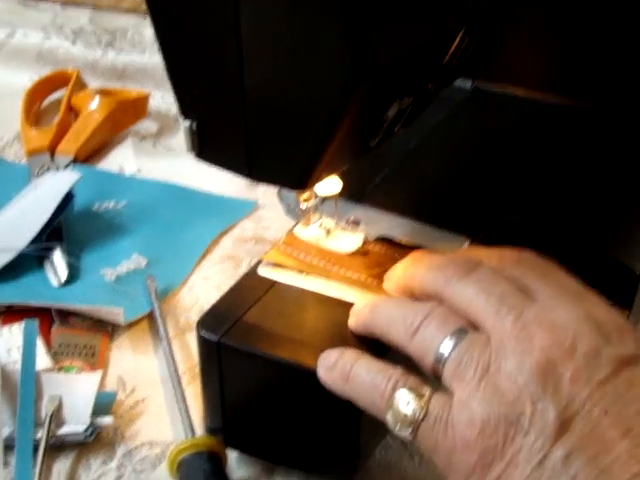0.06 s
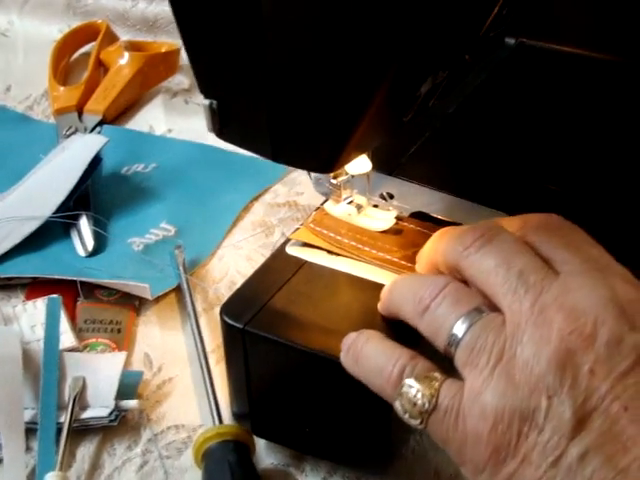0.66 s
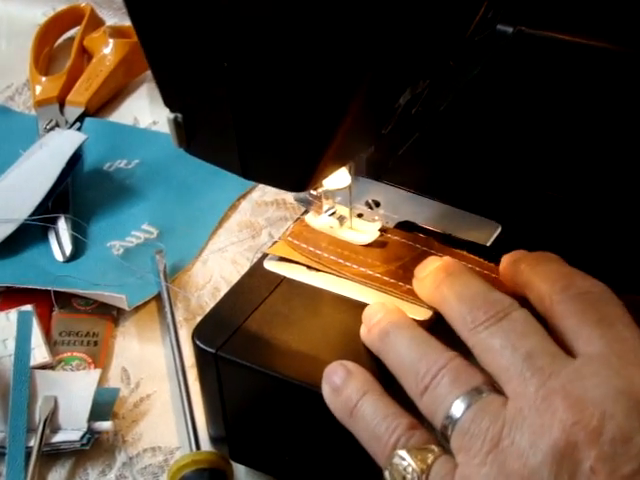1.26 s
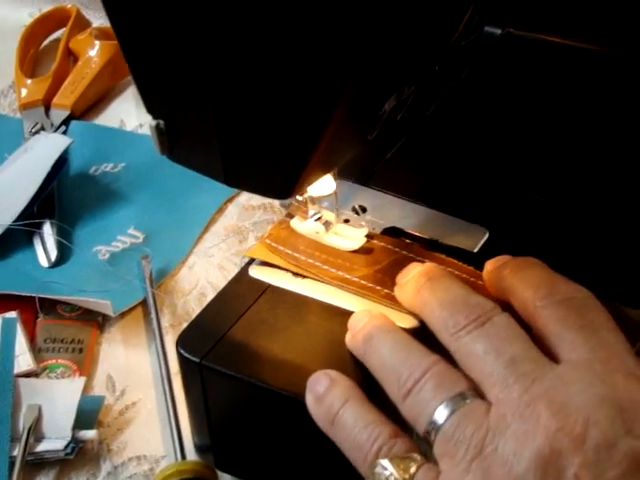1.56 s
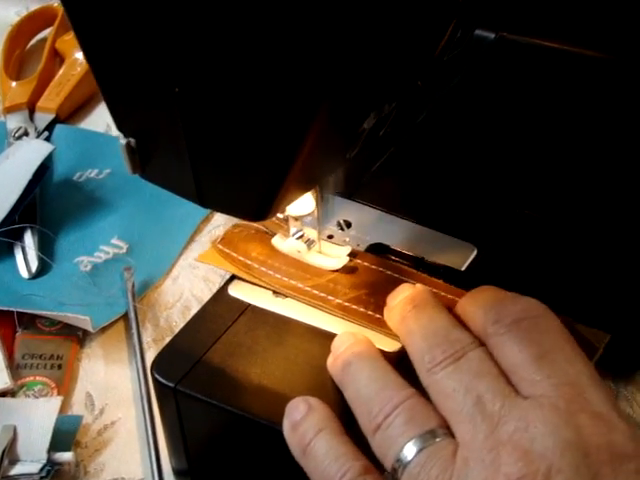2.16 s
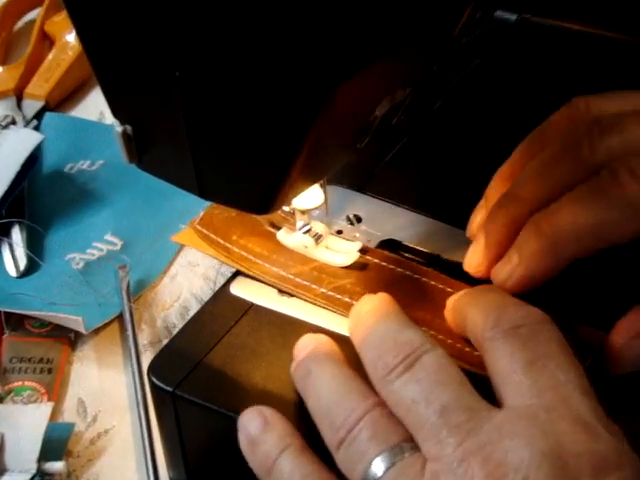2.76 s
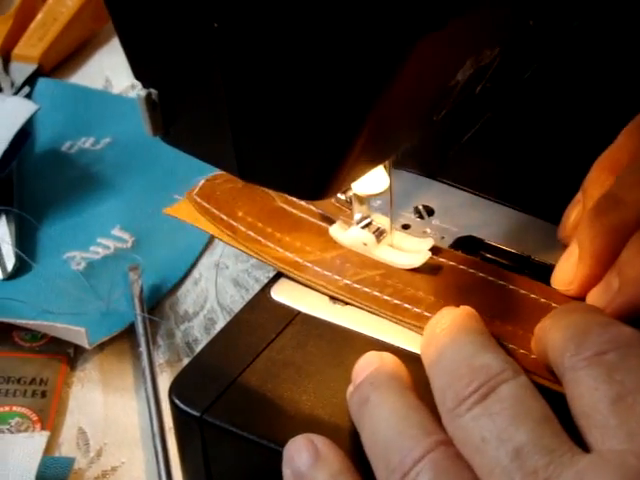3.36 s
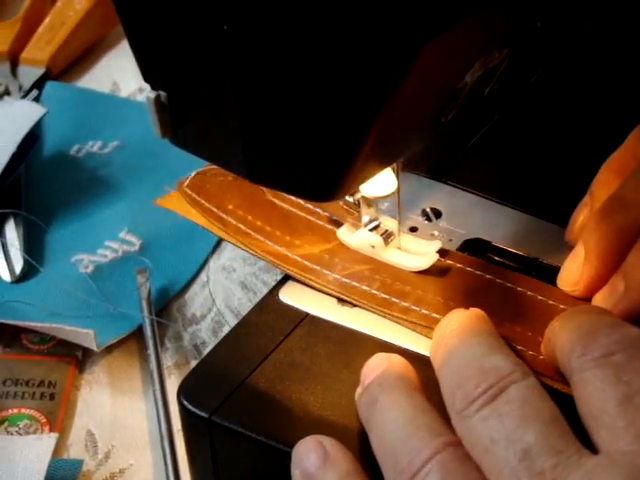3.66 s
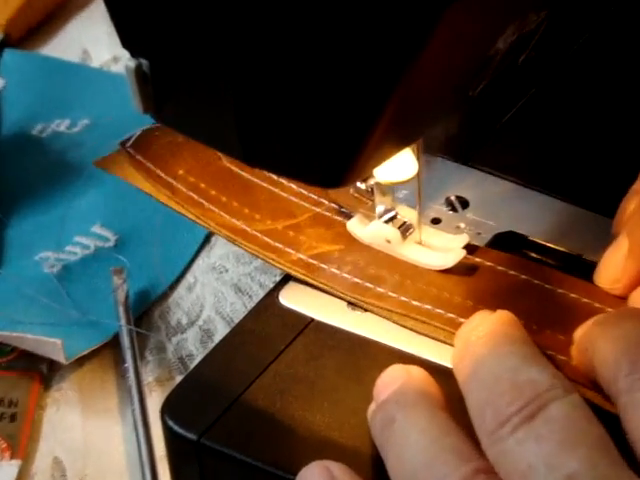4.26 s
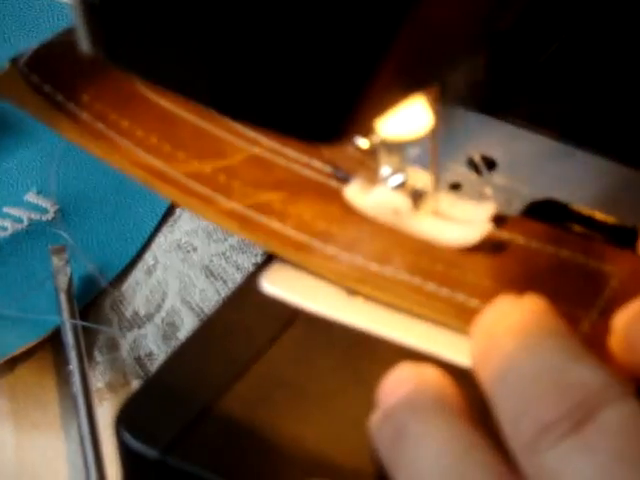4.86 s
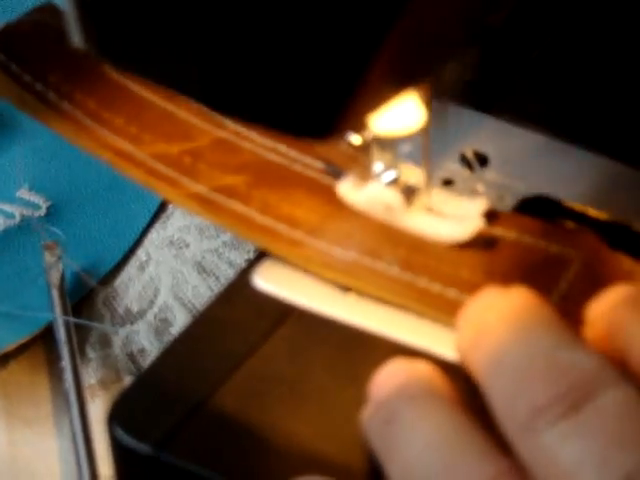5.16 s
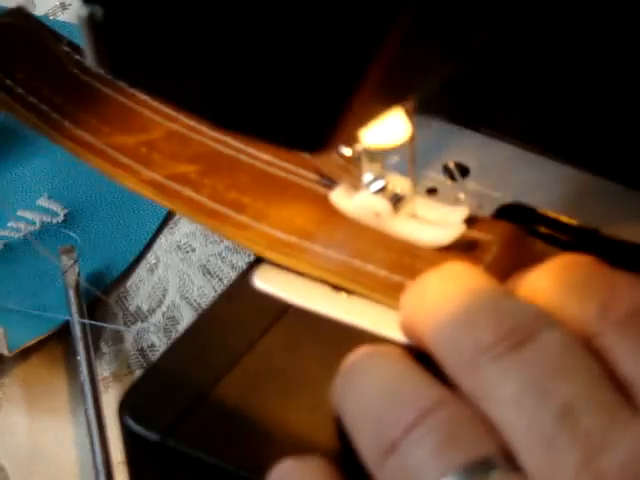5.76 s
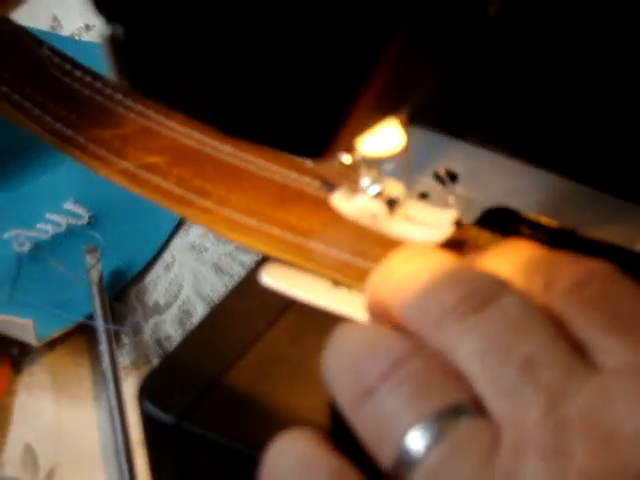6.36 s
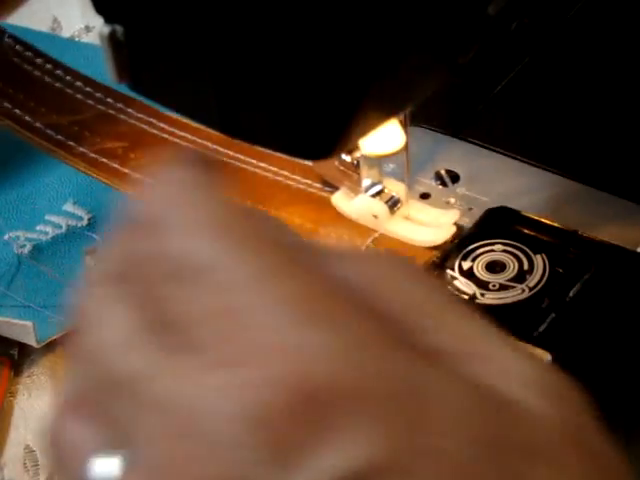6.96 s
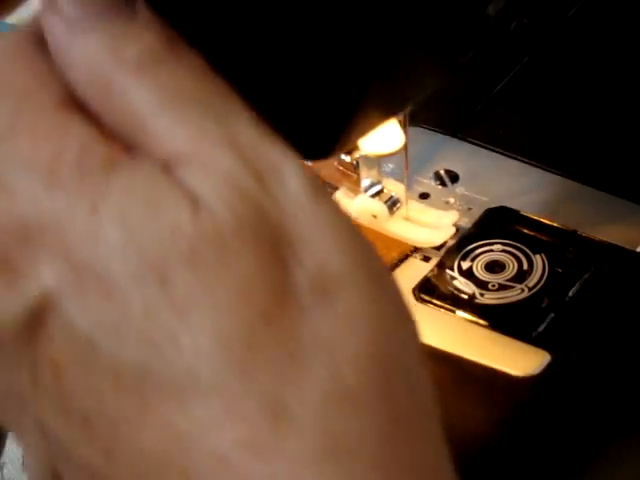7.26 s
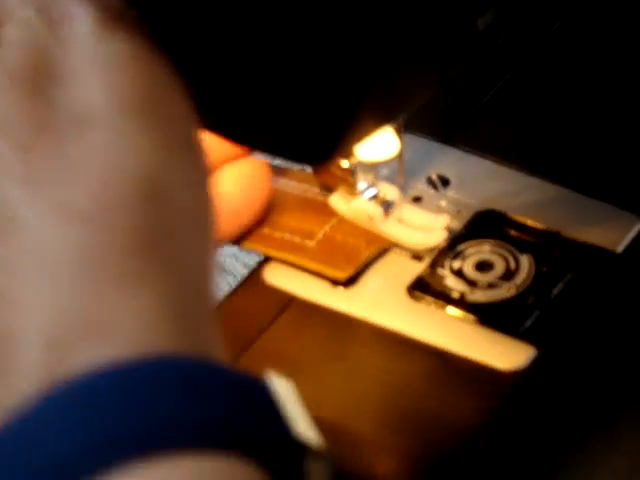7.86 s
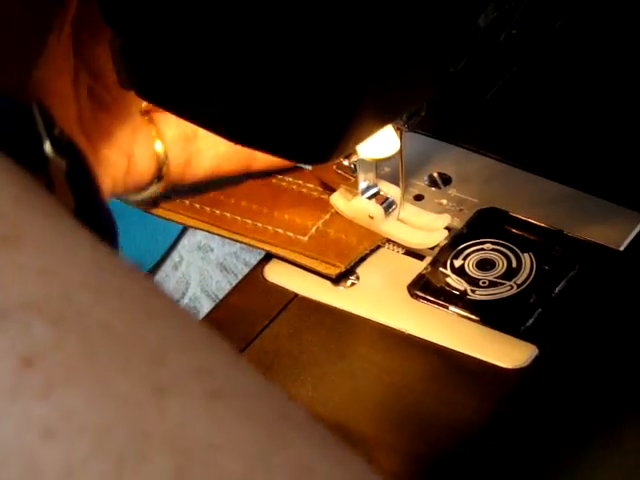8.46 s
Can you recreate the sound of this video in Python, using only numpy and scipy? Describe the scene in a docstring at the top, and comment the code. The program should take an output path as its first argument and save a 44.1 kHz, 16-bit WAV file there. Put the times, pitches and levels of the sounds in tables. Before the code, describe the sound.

A sewing machine clicks, starts up and stitches leather at a fast, rattling pace, then coasts to a stop before a clack.

```python
"""A household sewing machine stitches a leather strap on a table in a small room, close by.
The presser foot clicks onto the work, the drive squeaks twice, then the motor starts, nearly stalls
and runs at almost seven stitches a second. Each shaft turn repeats the same knocks and thumps over
a loose steel rattle, louder with speed. A lever snaps, the motor whines, the uncovered needle plate
rings. The machine coasts to a stop and a hand clacks against it."""
import sys
import numpy as np
from scipy import signal
from scipy.io import wavfile

SR = 44100
rng = np.random.default_rng(int(sys.argv[2]) if len(sys.argv) > 2 else 0)


def dump_mix(stems):
    """Bounce the given channels to the path in sys.argv[1] as a 16-bit WAV at rate SR."""
    frames = np.atleast_2d(stems).T  # one column per channel
    limited = np.clip(frames, -1, 1)  # hard clip at full scale
    pcm = np.round(limited * 32767).astype(np.int16)
    wavfile.write(sys.argv[1], SR, pcm)


N = 383802
TIME = np.arange(N) / SR
FULL_TURNS_PER_S = 6.6


def amp(db):
    """dB to gain."""
    return 10 ** (np.asarray(db) / 20)


def evened(x):
    """Scales to rms 1."""
    return x / np.sqrt(np.mean(x ** 2) + 1e-20)


def read(points, hz):
    """Interpolates a table over log frequency."""
    f, value = np.transpose(points)
    return np.interp(np.log(hz + 1), np.log(f + 1), value)


def add(mix, s, sound):
    """Mixes a sound in at time s."""
    part = mix[max(round(s * SR), 0):][:len(sound)]
    part += sound[:len(part)]


def coloured(x, points, peaks=()):
    """Minimum-phase filter from a smooth spectrum and resonance peaks."""
    hz = abs(np.fft.fftfreq(4096, 1 / SR))
    db = read(points, hz) + sum(rise / (1 + (2 * (hz - f) / width) ** 2) for f, width, rise in peaks)
    log_response = np.conj(signal.hilbert(np.log(amp(db))))
    taps = np.fft.ifft(np.exp(log_response)).real
    half = len(taps) // 2
    return signal.fftconvolve(x, taps[:half] * np.hanning(len(taps))[half:])[:len(x)]


def ringing(t60s, length_s):
    """Dense modes struck at once: noise with a decay time per frequency, energy 1."""
    count = int(length_s * SR)
    hz, t, spectrum = signal.stft(rng.standard_normal(count), SR, nperseg=128)
    t60 = np.maximum(read(t60s, hz), .005)[:, None]
    tail = signal.istft(spectrum * amp(-60 * t / t60) / np.sqrt(t60), SR)[1][:count]
    return tail / np.linalg.norm(tail)


def wavering(hz, width_hz, rough):
    """Tone on a pitch curve, wavering in amplitude and phase, rms 1."""
    lowpass = signal.butter(2, width_hz, fs=SR, output="sos")
    waver = signal.sosfilt(lowpass, rng.standard_normal((2, len(hz))))
    carrier = np.exp(2j * np.pi * np.cumsum(hz) / SR)
    modulation = 1 + rough * (evened(waver[0]) + 1j * evened(waver[1]))
    return evened((carrier * modulation).real)


def wander(per_s):
    """Slow random curve, rms 1."""
    knots = rng.standard_normal(int(N / SR * per_s) + 2)
    return evened(np.interp(TIME * per_s, np.arange(len(knots)), knots))


def strikes(hits, colour, modes, crack, bright_hz=(500, 5000), ring_rise_s=.0015):
    """Hard contacts and short chatter sound through the struck part; its modes ring on."""
    out, t = np.zeros(N), np.arange(SR // 2) / SR
    for s, db, bright_db, t60, ring_db, ring_bright_db in hits:
        tilt = list(zip(bright_hz, (0, ring_bright_db)))
        ring = sum(amp(mode_db + read(tilt, hz) - 60 * t / mode_t60) * np.sin(2 * np.pi * hz * t)
                   for hz, mode_db, mode_t60 in modes)
        ring *= 1 - np.exp(-t / ring_rise_s)
        chatter = (1 - np.exp(-t / .0013)) * amp(-60 * t / t60) * rng.standard_normal(len(t))
        contact = chatter / np.linalg.norm(chatter) + crack * (t == 0)
        blow = coloured(coloured(contact, colour), list(zip(bright_hz, (0, bright_db))))
        attack_rms = blow[:SR // 250].std()
        add(out, s, amp(db) * (blow / attack_rms + amp(ring_db) * ring))
    return out


def room_air(level_db=-49.5):
    """Quiet, steady air of the room."""
    # air spectrum: f/Hz, level/dB
    colour = [(30, -33), (90, -24), (160, -5), (270, -5), (450, -4), (900, -11), (1800, -16.5),
              (3800, -16.5), (6000, -23), (10000, -27)]
    return amp(level_db) * evened(coloured(rng.standard_normal(N), colour))


def strap_rubs(grains_per_s=1500, slide=.66):
    """Hands slide leather over the bed: grainy rubs that swell and fade."""
    # leather spectrum: f/Hz, level/dB
    colour = [(30, -48), (80, -32), (200, -12), (400, -2), (1050, -1), (1700, -14), (3200, -17),
              (6000, -27), (10000, -35)]
    # rubs: centre t/s, half length/s, level/dB
    rubs = [(0.085, 0.035, -38), (7.87, 0.06, -43), (8.11, 0.09, -38), (8.455, 0.04, -41),
            (8.68, 0.03, -40)]
    grains = rng.standard_normal(N) * (rng.random(N) < grains_per_s / SR)
    scuff = evened(coloured(evened(grains) + slide * rng.standard_normal(N), colour))
    return scuff * sum(amp(db) * np.exp(-((TIME - s) / half_s) ** 2) for s, half_s, db in rubs)


def presser_foot():
    """The foot clicks as it is set on the work."""
    # contacts: t/s, level/dB, brightness/dB, t60/s, ring/dB, ring brightness/dB
    hits = [(.151, -31.5, 2, .1, -20, 0), (.186, -27, -1, .07, -17, 0), (.246, -35, -6, .06, -20, -6),
            (.253, -25, -8, .04, -20, -6), (.317, -18, -7, .035, -15, -4), (.331, -27, 8, .047, -12, -4),
            (.346, -31, 0, .06, -4, -14), (.405, -41, -15, .066, -20, -10),
            (.622, -24.5, -12, .045, -15, 4), (.7505, -34, -10, .05, -22, -6),
            (.87, -43, -5, .034, -19, -6)]
    # contact spectrum: f/Hz, level/dB
    colour = [(35, -55), (110, -28), (280, -3), (470, -1), (720, -7), (1100, 2), (1500, -2.5),
              (2300, -11.5), (4000, -14), (6000, -21.5), (10000, -33)]
    # foot modes: f/Hz, level/dB, t60/s
    modes = [(415, 1, .16), (505, -2, .14), (1140, -6, .1), (1610, -10, .1), (2988, -1, .12),
             (3526, -12, .08), (4050, -12, .1)]
    return strikes(hits, colour, modes, crack=.32)


def squeaks(rise_s=.005, t60_s=.16, sag_hz_per_s=200, scrape_db=-6):
    """The drive slips as it takes up: a rough, sagging tone in a dry scrape."""
    # slips: t/s, f/Hz, level/dB
    slips = [(1.002, 725, -35.5), (1.136, 690, -28)]
    # scrape spectrum: f/Hz, level/dB
    colour = [(100, -30), (400, -10), (700, 0), (1100, -15), (3000, -21), (9000, -42)]
    out, t = np.zeros(N), np.arange(SR // 3) / SR
    for s, hz, db in slips:
        scrape = evened(coloured(rng.standard_normal(len(t)), colour))
        tone = wavering(hz - sag_hz_per_s * t, width_hz=110, rough=.4)
        envelope = (1 - np.exp(-t / rise_s)) * amp(db - 60 * t / t60_s)
        add(out, s, (tone + amp(scrape_db) * scrape) * envelope)
    return out


def groans():
    """The loaded motor hums in short glides as it starts and as it nearly stalls."""
    # glides: t/s, length/s, first f/Hz, last f/Hz, level/dB
    glides = [(1.19, .18, 640, 630, -48), (1.355, .1, 290, 380, -32), (1.775, .06, 560, 550, -32),
              (1.815, .085, 300, 400, -31)]
    out = np.zeros(N)
    for s, length_s, first_hz, last_hz, db in glides:
        progress = np.linspace(0, 1, int(length_s * SR))
        hum = wavering(first_hz + (last_hz - first_hz) * progress, width_hz=60, rough=.5)
        add(out, s, amp(db) * np.sqrt(4 * progress * (1 - progress)) * hum)
    return out


def shaft(start_turns=.186):
    """Pace (1 at full speed) and angle in turns; the needle strikes at whole turns."""
    # shaft speed: t/s, speed/(turns/s)
    speeds = [(1.26, 0.0), (1.439, 5.62), (1.56, 6.709), (1.696, 5.777), (1.795, 2.344), (1.882, 2.166),
              (1.944, 6.027), (2.172, 7.366), (2.502, 5.999), (2.75, 6.034), (3.195, 6.495), (4.101, 6.627),
              (5.0, 6.603), (5.5, 6.755), (7.303, 6.771), (7.504, 5.504), (7.62, 3.804), (7.74, 0.0)]
    turns_per_s = np.interp(TIME, *np.transpose(speeds), left=0, right=0)
    return turns_per_s / FULL_TURNS_PER_S, start_turns + np.cumsum(turns_per_s) / SR


def passes(angle, phase):
    """Times in s at which the shaft passes one phase of its turn."""
    marks = np.arange(np.ceil(angle[0] - phase), angle[-1] - phase) + phase
    return TIME[np.searchsorted(angle, marks)]


def drive(pace, full_speed_db=-33):
    """Belt and motor rumble whenever the shaft turns."""
    # rumble spectrum: f/Hz, level/dB
    colour = [(30, -9), (60, -18), (110, -24), (200, -11), (380, 0), (480, 0), (580, -2), (1000, -8),
              (1400, -13), (2400, -10), (4000, -8.5), (9000, -67.5)]
    return amp(full_speed_db) * evened(coloured(rng.standard_normal(N), colour)) * pace ** .85


def knocks(angle, slop_s=.0006, uneven_db=1.2, glance=.5, tilt_hz=(139, 3330)):
    """Needle bar, hook, take-up and feed strike the frame, a little differently each turn."""
    # joints: phase/turns, level/dB, hardness (treble up, bass down)/dB
    joints = [(-.014, 0, 1), (.028, -2, 5.5), (.066, -3, 7), (.108, -4.5, 5.5), (.13, 2, 3),
              (0.186, -3.5, -1.5), (.24, -7.5, -1), (.37, -0.5, 0), (.432, -1, -0.5), (.497, -3, -2),
              (.565, -2.5, 1), (.615, -0.5, -0.5), (.655, -5.5, 3), (.715, -0.5, -1.5), (.765, -3, -3),
              (.83, -4, -0.5), (.9, -1, -1)]
    # ring of a blow: f/Hz, t60/s
    decay = [(150, 0.17), (420, 0.051), (1200, 0.079), (3000, 0.055), (9000, 0.0015)]
    out, t = np.zeros(N), np.arange(SR // 10) / SR
    seating = 1 - np.exp(-t / .002)  # an oiled joint takes up its play softly
    for phase, db, hard_db in joints:
        tilt = list(zip(tilt_hz, (-hard_db, hard_db)))
        blow, *others = [coloured(seating * ringing(decay, .1), tilt) for _ in range(4)]
        for s, (late, harder, *glancing) in zip(passes(angle, phase), rng.standard_normal((50, 5))):
            knock = blow + glance * np.dot(glancing, others)  # glancing blows wake other modes
            add(out, s + slop_s * late, amp(db + uneven_db * harder) * knock)
    return evened(out)


def bursts(angle, between_db=-9, play_turns=.016, uneven_db=1.8):
    """Envelope of the shaking of loose parts: bursts near set angles, varying per stitch."""
    # shakes from needle, take-up and feed: phase/turns, half width/turns, level/dB
    shakes = [(0.059, 0.032, 15), (0.142, 0.048, 4.5), (0.29, 0.041, 4), (.40, 0.14, 9.5), (0.56, .07, 1),
              (0.701, 0.061, 7.5)]
    loose = angle + play_turns * wander(15)
    peaks = sum(amp(db) * np.exp(-(((loose - phase + .5) % 1 - .5) / width) ** 2)
                for phase, width, db in shakes)
    turning = (angle > angle[0]) & (angle < angle[-1])
    return (amp(between_db) + peaks) * amp(uneven_db * wander(60)) * turning


def rattle(angle, ticks_per_s=1700, spread_db=1.0, hiss=.39):
    """Loose steel and running thread tick at random within the bursts."""
    # rattle spectrum ahead of the casing: f/Hz, level/dB
    colour = [(100, -12), (400, -1), (1000, -8), (2500, -6.5), (5000, 1.5), (9000, -2.5)]
    ticks = (rng.random(N) < ticks_per_s / SR) * rng.choice([-1, 1], N)
    strength = amp(spread_db * np.minimum(rng.exponential(1, N), 4))
    noise = evened(ticks * strength) + hiss * rng.standard_normal(N)
    return evened(coloured(noise * bursts(angle), colour))


def clatter(angle, modes, taps_per_s):
    """Loose steel parts, tapped at random within the bursts, ring one mode each; rms 1."""
    out, t = np.zeros(N), np.arange(SR // 12) / SR
    for hz, width_hz, db in modes:
        taps = rng.uniform(-.94, 1, N) * (rng.random(N) < taps_per_s / SR) * bursts(angle)
        ring = np.exp(-np.pi * width_hz * t) * np.sin(2 * np.pi * hz * t)
        out += amp(db) * evened(signal.oaconvolve(taps, ring)[:N])
    return evened(out)


def thump(hz, db, t60_s, rise_s=.0033):
    """One low casing mode, pushed softly."""
    t = np.arange(SR // 8) / SR
    return (1 - np.exp(-t / rise_s)) * amp(db - 60 * t / t60_s) * np.sin(2 * np.pi * hz * t)


def thumps(angle, uneven_db=1.0, detune=.008):
    """Heavy parts reverse at set angles, each ringing one low casing mode."""
    # reversals: phase/turns, f/Hz, level re body/dB, t60/s
    reversals = [(-.02, 995, 15.5, 0.024), (-.03, 550, 10, 0.032), (-.04, 392, 5, 0.053),
                 (.03, 571, 6.5, 0.058), (0.071, 408, 1.5, 0.035), (.085, 550, 10.5, 0.06),
                 (0.101, 1074, 9.5, 0.03), (0.167, 358, 14.5, 0.05), (0.171, 299, 9, 0.051),
                 (0.349, 561, 2, 0.043), (0.37, 369, 9, 0.049), (.54, 395, 6.5, .04), (.63, 568, 4, 0.081),
                 (0.678, 383, 9, 0.068), (0.719, 304, 7, 0.026), (0.811, 398, 14, 0.032)]
    out = np.zeros(N)
    for phase, hz, db, t60_s in reversals:
        for s, (harder, off) in zip(passes(angle, phase), rng.standard_normal((50, 2))):
            add(out, s, thump(hz * (1 + detune * off), db + uneven_db * harder, t60_s))
    return out


def thuds(angle, first_hz=400, last_hz=82, fall_s=.009, t60_s=.06, uneven_db=1.5):
    """The machine rocks on its table four times a turn: soft thuds falling in pitch."""
    # rocking: phase/turns, level re body/dB
    rocks = [(.045, -3.5), (.145, -0.5), (0.385, -4.5), (.695, -2.5)]
    out, t = np.zeros(N), np.arange(SR // 8) / SR
    hz = last_hz + (first_hz - last_hz) * np.exp(-t / fall_s)
    thud = (1 - np.exp(-t / .003)) * amp(-60 * t / t60_s) * np.sin(2 * np.pi * np.cumsum(hz) / SR)
    for phase, db in rocks:
        for s, softer in zip(passes(angle, phase), rng.standard_normal(50)):
            add(out, s, amp(db - uneven_db * softer) * thud)
    return out


def machine(pace, angle, body_db=-26, steel_db=-24.5, knock_db=-3, rattle_db=-1, split_hz=1600):
    """Knocks and rattle sound through the casing; steel treble rises faster with speed than the body."""
    # casing on its table: f/Hz, gain/dB
    casing = [(30, -55), (55, -36.5), (120, -17), (190, -20), (300, -4), (380, -5), (480, -4.5), (570, -1),
              (740, -6), (920, -3.5), (1050, -7), (1450, -14), (3700, -17), (7000, -26), (10000, -32)]
    # peaks and dips of the steel frame: f/Hz, width/Hz, gain/dB
    frame = [(1930, 59, 3.5), (2350, 80, 0.5), (2640, 41, 9.5), (3210, 120, 0.5), (3920, 100, -5.5),
             (5020, 120, 1), (5670, 130, -5.5), (7250, 270, -2.5), (8230, 1560, 2.5)]
    # modes of loose parts: f/Hz, width/Hz, level/dB
    loose_modes = [(2490, 50, -1), (2657, 32, -4), (2800, 72, 1), (3144, 110, -0.5), (3613, 79, -4.5),
                   (3950, 64, -4.5), (4206, 60, -5), (4464, 45, -6), (5380, 120, -6.5), (8320, 100, -10)]
    # level drift along the seam: t/s, body/dB, steel/dB
    drift = [(1.28, -2, -22), (1.371, -7.5, -15.5), (1.5, 1, -4), (2.1, 0.5, -5.5), (2.5, 1.5, -5),
             (3.3, 2, -4), (5.602, 1, -4.8), (6.6, 0.5, -5.5), (7.35, -0.5, -4), (7.56, -4.5, -9),
             (7.66, -5, -24), (7.71, -20, -24)]
    s, body_drift_db, steel_drift_db = np.transpose(drift)
    impacts = coloured(amp(knock_db) * knocks(angle) + amp(rattle_db) * rattle(angle), casing, frame)
    low = signal.sosfiltfilt(signal.butter(3, split_hz, fs=SR, output="sos"), impacts)
    high = impacts - low
    running = pace > 0
    body = low / low[running].std() + thumps(angle) + thuds(angle)
    steel = high / high[running].std() + amp(-6) * clatter(angle, loose_modes, taps_per_s=120)
    out = body * pace ** .31 * amp(body_db + np.interp(TIME, s, body_drift_db))
    out += steel * pace ** .86 * amp(steel_db + np.interp(TIME, s, steel_drift_db))
    add(out, 7.592, thump(hz=410, db=-15, t60_s=.1))  # the mechanism settles as it stops
    return out


def lever():
    """A lever snaps home while the machine runs."""
    # contacts: t/s, level/dB, brightness/dB, t60/s, ring/dB, ring brightness/dB
    hits = [(2.2108, -10.2, 2, .025, -16, 0), (2.218, -16.5, -1, .03, -16, 0)]
    # contact spectrum: f/Hz, level/dB
    colour = [(35, -60), (150, -32), (500, -12), (950, -2), (2200, 4), (3500, -5.5), (6000, -20),
              (10000, -22)]
    # lever modes: f/Hz, level/dB, t60/s
    modes = [(895, 13, 0.07), (1270, 8, .05), (1840, -4, 0.057)]
    return strikes(hits, colour, modes, crack=.26)


def whine(angle, dip=.65, wobble=.01):
    """The motor's tone dips in level at each needle stroke and wavers in pitch with the load."""
    # motor tone: t/s, f/Hz, level/dB
    track = [(3.0, 812, -42), (3.17, 820, -29), (3.35, 830, -29), (3.5, 826, -29), (3.8, 835, -30),
             (4.15, 842, -30.5), (4.38, 830, -31), (4.58, 841, -31), (4.93, 825, -30), (5.25, 849, -31),
             (5.4, 847, -31), (5.8, 858, -30.5), (6.0, 852, -34), (6.2, 855, -32), (6.5, 847, -34),
             (6.95, 861, -34), (7.2, 850, -33.5), (7.38, 825, -34), (7.48, 765, -39), (7.6, 690, -48)]
    s, hz, db = np.transpose(track)
    stroke = np.cos(np.pi * angle) ** 16
    load = np.cos(2 * np.pi * angle) / 2 + np.cos(6 * np.pi * (angle - .54))
    pitch_hz = np.interp(TIME, s, hz) * (1 + wobble * load + .004 * wander(14))
    level = amp(np.interp(TIME, s, db, left=-120, right=-120))
    return level * (1 - dip * stroke) * wavering(pitch_hz, width_hz=30, rough=.2)


def needle_plate(angle):
    """As the strap runs off the plate, the bare steel rings under quick loose taps."""
    # plate modes: f/Hz, width/Hz, level/dB
    modes = [(2470, 60, -1), (2660, 60, -1), (2830, 70, -3), (3550, 70, 0), (3700, 70, -2), (4430, 60, -8)]
    # swell of the ringing: t/s, level/dB
    swell = [(5.5, -48), (6.5, -42), (6.95, -39), (7.25, -35), (7.44, -32), (7.54, -39), (7.66, -54)]
    level = amp(np.interp(TIME, *np.transpose(swell), left=-120, right=-120))
    return level * clatter(angle, modes, taps_per_s=200)


def hand_bumps():
    """A hand reaches behind the needle and knocks the casing."""
    # contacts: t/s, level/dB, brightness/dB, t60/s, ring/dB, ring brightness/dB
    hits = [(7.801, -39, -3, .05, -22, 0), (7.821, -35, -12, .05, -16, -6),
            (7.837, -36, -16, .035, -20, -6), (7.935, -40, -6, .09, -18, 0), (7.994, -38, -6, .06, -18, -6),
            (8.028, -21, -6, .045, -11, -2), (8.036, -20.5, -4, .04, -13, -2),
            (8.077, -30, -8, .06, -12, 0), (8.123, -37, -4, .08, -9, 5), (8.268, -43, -15, .05, -18, -8),
            (8.408, -40, -18, .05, -16, -6), (8.45, -42, -19, .07, -10, -10),
            (8.654, -36.5, -20, .09, -12, -10)]
    # contact spectrum: f/Hz, level/dB
    colour = [(35, -52), (100, -34), (300, -3), (490, 3), (700, 0), (930, -1), (1130, -5), (1350, -2),
              (2200, -9), (4000, -9), (6500, -13), (10000, -26)]
    # casing modes: f/Hz, level/dB, t60/s
    modes = [(480, 5, 0.16), (657, -3, 0.28), (899, 1, 0.33), (942, -1, 0.36), (1034, -6, .3),
             (1320, -3, 0.2), (2476, -10, .25), (2842, -12, .22), (3187, -11, 0.2)]
    return strikes(hits, colour, modes, crack=.035)


def scene(room_db=-11, room_delay_s=.006):
    """Machine and hands in a small furnished room."""
    # reverberation: f/Hz, t60/s
    room_decay = [(150, 0.057), (500, 0.42), (1500, 0.3), (4000, 0.64), (9000, 0.06)]
    pace, angle = shaft()
    direct = machine(pace, angle) + drive(pace) + strap_rubs()
    direct += presser_foot() + lever() + hand_bumps()
    direct += whine(angle) + groans() + needle_plate(angle) + squeaks()
    out = direct + room_air()
    reverb = signal.oaconvolve(direct, ringing(room_decay, .6))[:N]
    add(out, room_delay_s, amp(room_db) * reverb)
    return out[None]


def record(dry, bass_cut_hz=65, ceiling=.7, edge_hz=10120):
    """A small microphone loses deep bass; the loudest peaks are rounded off, and a band limit follows."""
    thin = signal.sosfilt(signal.butter(2, bass_cut_hz, "high", fs=SR, output="sos"), dry)
    rounded = thin / (1 + (thin / ceiling) ** 6) ** (1 / 6)
    lowpass = signal.firwin(701, edge_hz, window=("kaiser", 8), fs=SR)
    return signal.oaconvolve(rounded, lowpass[None], "same")


dry = scene()
out = record(dry)
dump_mix(out)
```